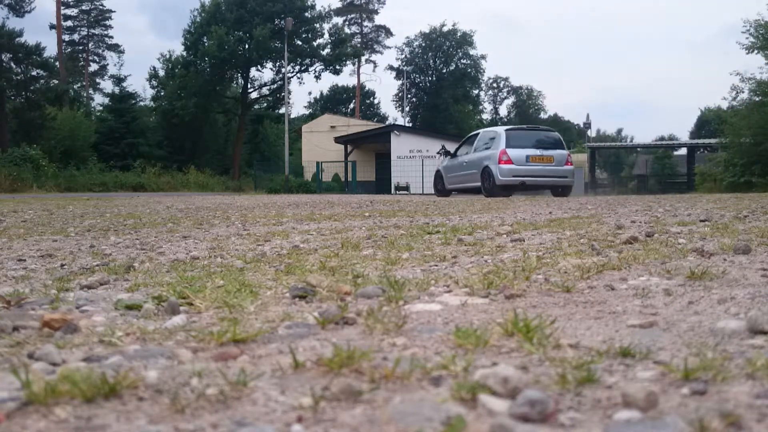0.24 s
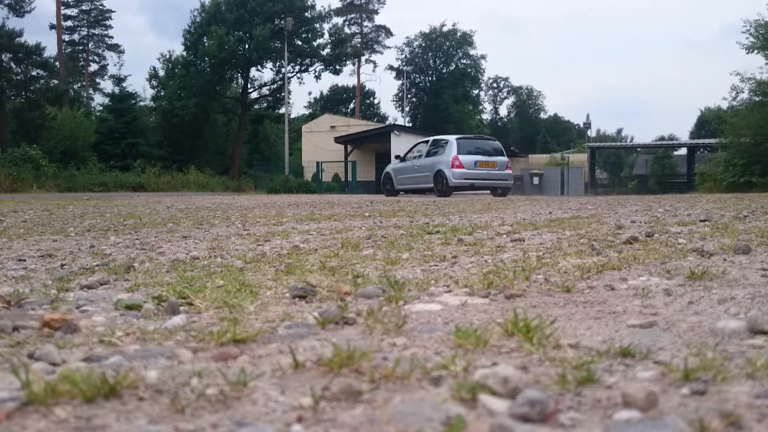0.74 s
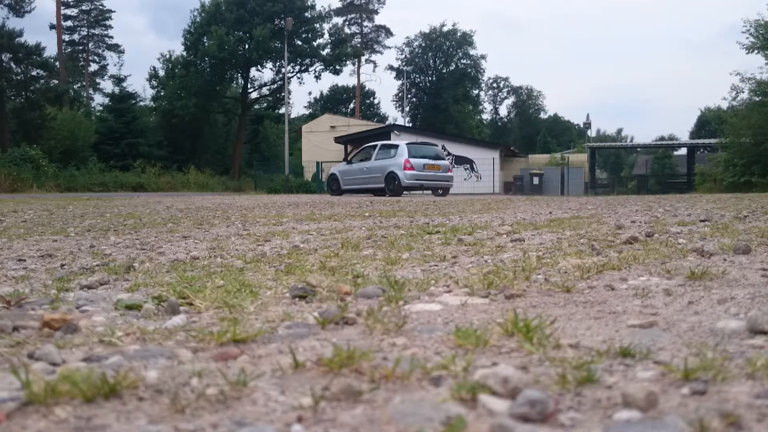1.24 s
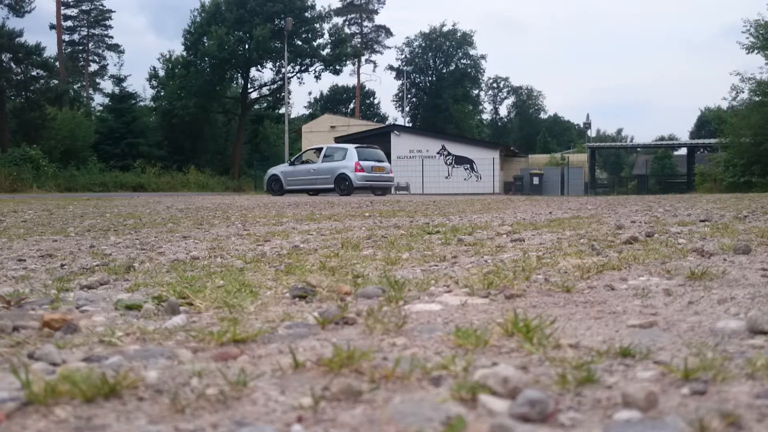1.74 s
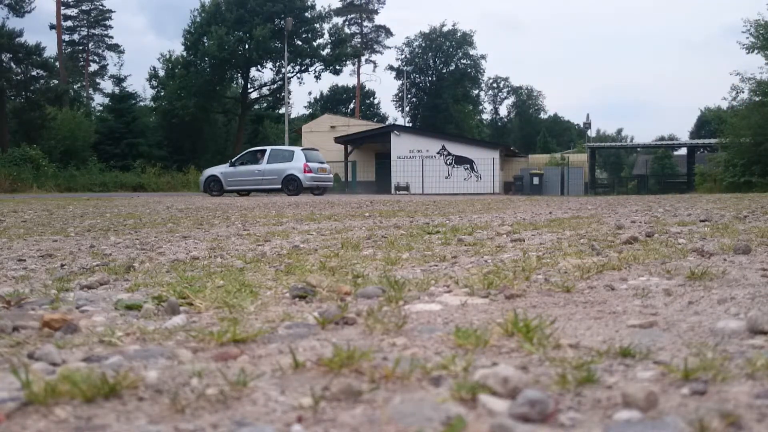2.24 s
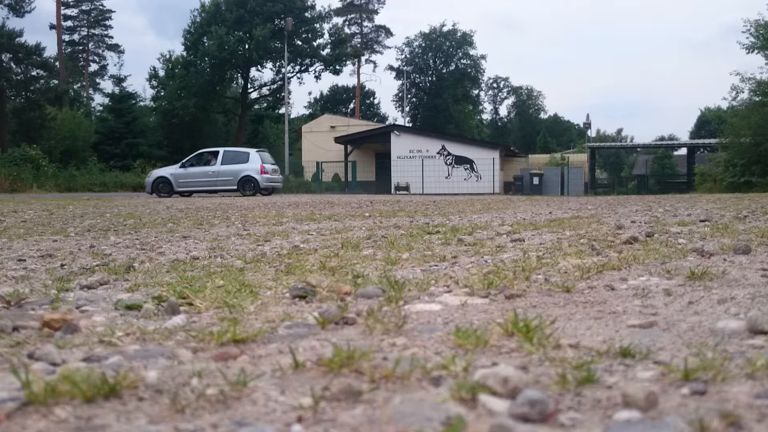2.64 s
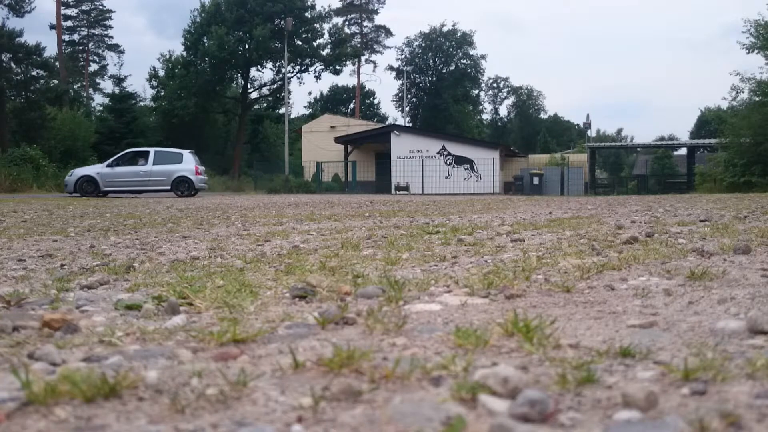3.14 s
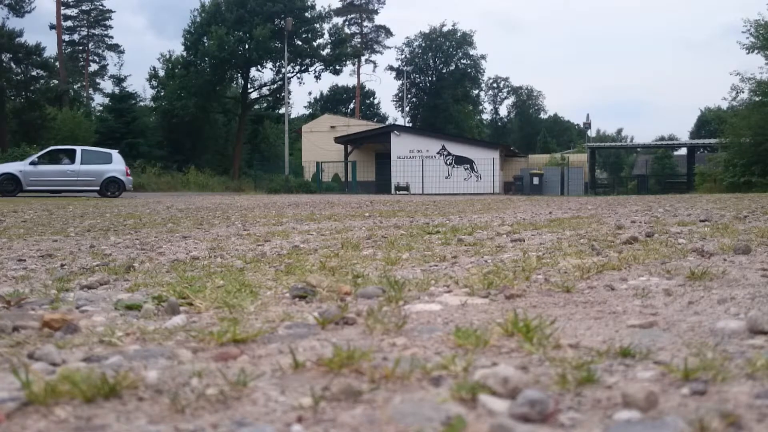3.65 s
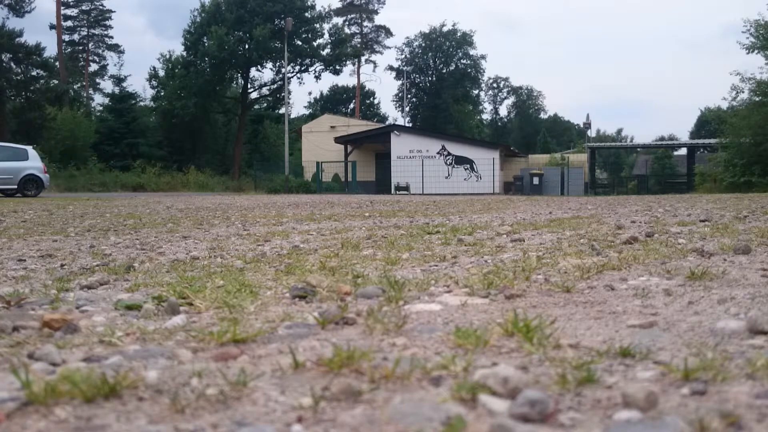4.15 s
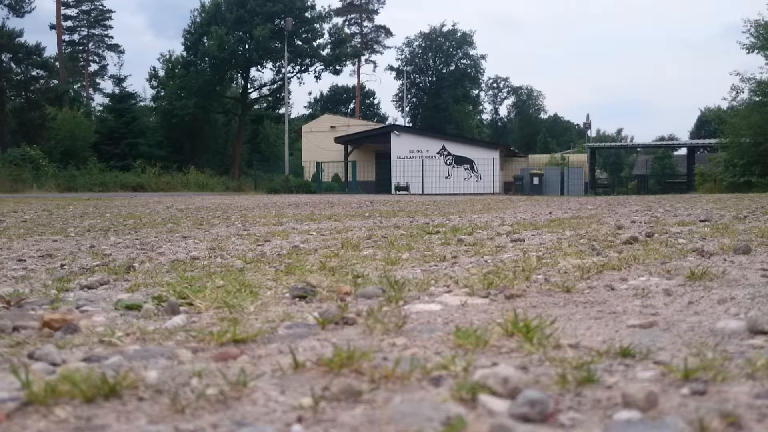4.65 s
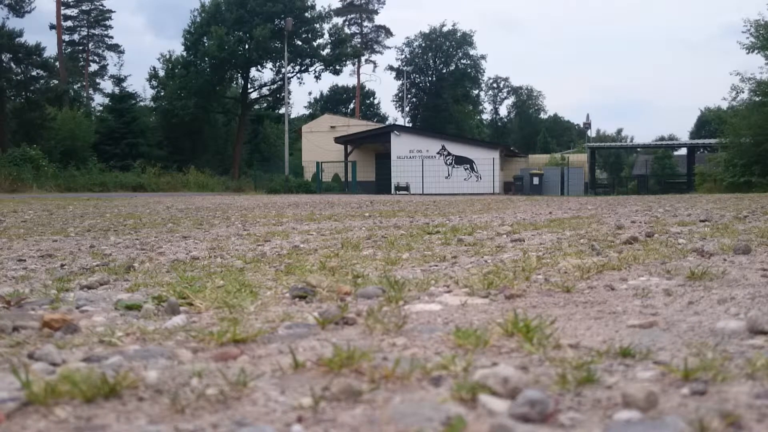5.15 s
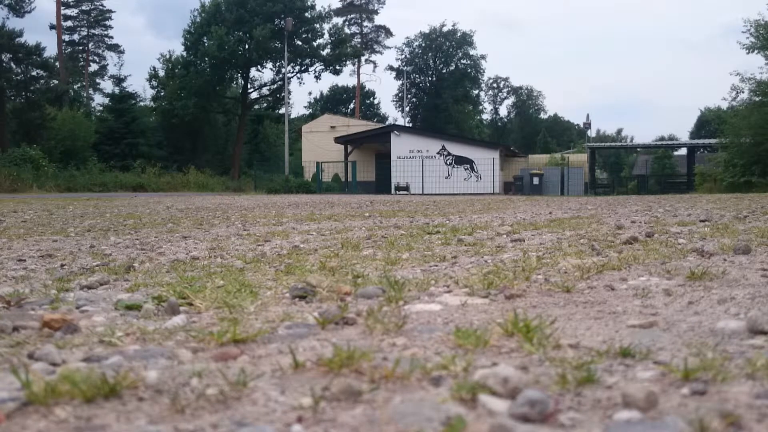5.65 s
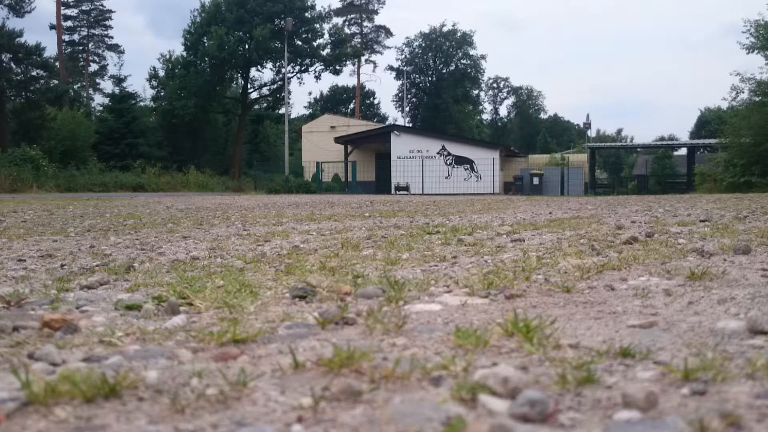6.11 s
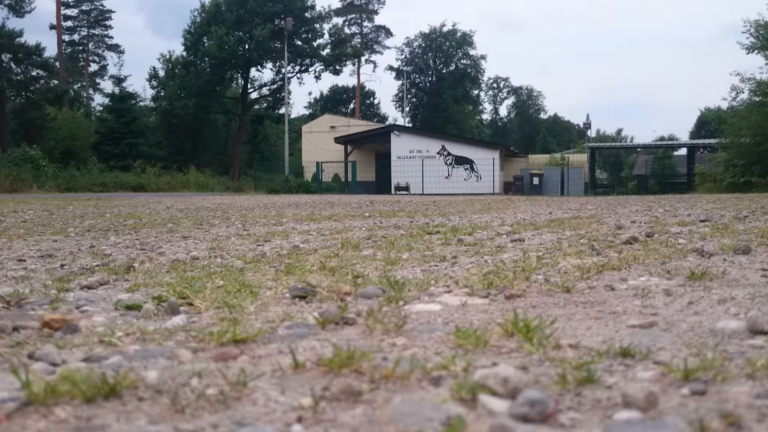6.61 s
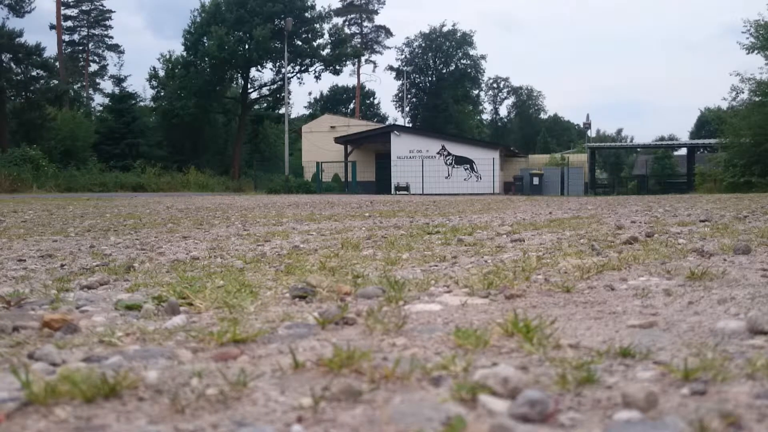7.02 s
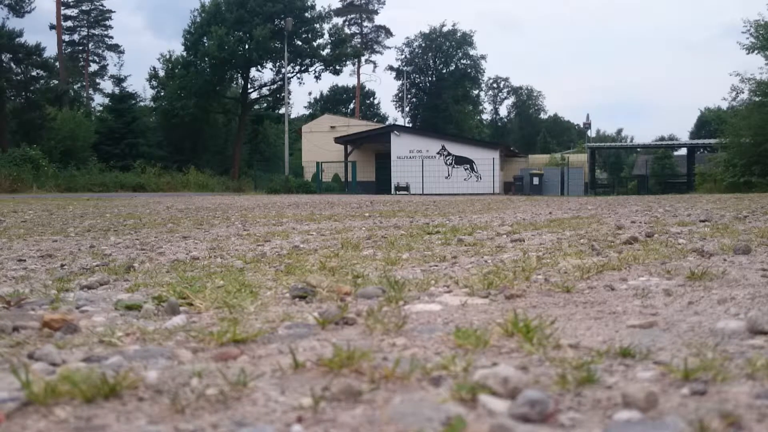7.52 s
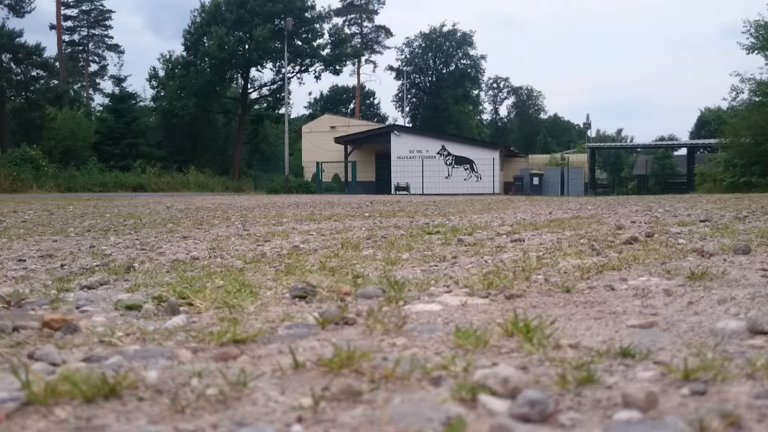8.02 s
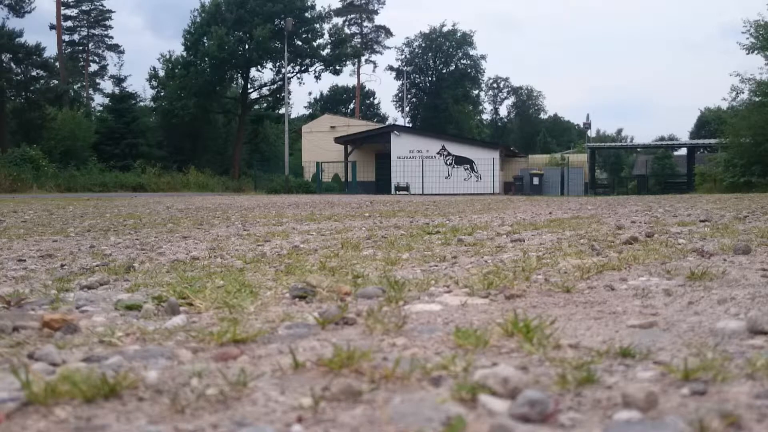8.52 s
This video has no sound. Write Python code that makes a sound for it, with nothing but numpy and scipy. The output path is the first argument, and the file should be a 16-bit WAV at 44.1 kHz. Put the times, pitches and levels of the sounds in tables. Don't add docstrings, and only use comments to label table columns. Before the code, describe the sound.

A small car with a loud, droning exhaust rolls away crunching gravel, then accelerates hard to a roar, shifts up with burbling pops and pulls again.

```python
import sys
import numpy as np
from scipy import signal
from scipy.fft import rfft, irfft, next_fast_len
from scipy.io import wavfile
from scipy.ndimage import map_coordinates

SR = 44100
rng = np.random.default_rng(int(sys.argv[2]) if len(sys.argv) > 2 else 0)


def materialize(psi):
    bounded = np.clip(np.atleast_2d(psi).T, -1, 1)
    quanta = np.round(bounded * 32767).astype(np.int16)
    wavfile.write(sys.argv[1], SR, quanta)


def rack_gain(trim_db):
    fader = np.asarray(trim_db, float)
    return 10 ** (fader / 20)


N = 386757
TIME = np.arange(N) / SR


def unit(x):
    return x / np.sqrt(np.mean(x ** 2) + 1e-20)


def along(points, hz):
    f, v = np.transpose(points)
    return np.interp(np.log(hz + 1), np.log(f + 1), v)


def curves(rows):
    s, *cols = np.transpose(rows)
    return [np.interp(TIME, s, c) for c in cols]


def chance(clock):
    return map_coordinates(rng.standard_normal(9000), [clock + 2])


def wobble(rate):
    coarse = np.arange(0, N + 32, 32)
    return np.interp(np.arange(N), coarse, chance(coarse * rate / SR))


def coloured(x, points):
    m = next_fast_len(N + 8192)
    hz = np.fft.rfftfreq(m, 1 / SR)
    inside = (hz > points[0][0] / 2) & (hz < points[-1][0] * 2)
    return irfft(rfft(x, m) * rack_gain(along(points, hz)) * inside, m)[..., :N]


def noise(points):
    return unit(coloured(rng.standard_normal(N), points))


# time in seconds, firing rate in Hz.
FIRST_GEAR = [(0, 60.35), (.75, 63.78), (1.05, 60.53), (1.4, 60.43), (2.4, 55.04), (2.86, 55.13),
              (3.3, 60.3), (3.95, 64.68), (4.54, 74.2), (5.3, 93.02), (5.7, 110.6), (6.4, 157.7),
              (6.8, 184.5), (7, 195.5), (7.2, 207.7), (7.4, 216.6), (7.53, 222)]
# time in seconds, firing rate in Hz.
GEAR_CHANGE = [(7.6, 222), (7.66, 217.5), (7.72, 209.5), (7.78, 200.6), (7.9, 189), (8.08, 169),
               (8.14, 159), (8.21, 143.5), (8.26, 141.5), (8.37, 136.8), (8.44, 140.3), (8.77, 147)]


def speed():
    rows = [(s, np.log(hz)) for s, hz in list(FIRST_GEAR) + list(GEAR_CHANGE)]
    return np.exp(curves(rows)[0])


# time in seconds, throttle from 0 to 1, pressure left in the pipe from 0 to 1.
THROTTLE = [
    (7.56, 1, 1),
    (7.63, 0, .6),
    (7.95, 0, 0),
    (8.21, 0, 0),
    (8.235, 1, 1),
]
SECOND_GEAR_S, OPEN_AGAIN_S = THROTTLE[-2][0], THROTTLE[-1][0]


def throttle():
    opening, pressure = curves(THROTTLE)
    return 1 - opening, 1 - pressure


# time in seconds, firing tone in dB, fullness of the pulse in dB,
# third order in dB, edge of the pulse in dB.
EFFORT = [(0, -22.5, 0.5, 3, 2), (.56, -21, -2.5, -2.5, -1.5), (.8, -24.5, -11, -2.5, -16),
          (1.7, -27, 0, -2, -11), (2.2, -31.5, -0.5, 2, -8), (2.7, -29, 1, 2, -15),
          (2.95, -27.5, 7.5, 2.5, -6.5), (3.93, -22.5, -0.5, -1.5, -2), (4.04, -17.5, -4.5, -4, 0),
          (4.5, -14.5, -7.5, -13.5, -7), (5, -16.5, -3.5, -3.5, -5), (5.3, -14.5, -6, -1, -6.5),
          (5.7, -16.5, -7.5, -8, -7), (6.15, -18.5, -7.5, -0.5, -8.5), (6.36, -17, 1, -13.5, -3),
          (6.6, -17.5, 3.5, 0, 0.5), (6.85, -20, 4.5, 5, 4), (7.4, -20, 3.5, 6, 7.5)]
SECOND_EFFORT = [(8.24, -14.5, -0.5, 0, -1), (8.4, -15, -3.5, -5, -1.5), (8.58, -11, -11.5, -6.5, -16),
                 (8.68, -12.5, -6.5, -7.5, -15), (8.77, -16, -13, -6.5, -13.5)]
# time in seconds, level in dB.
SHIFT = [(7.56, 0), (7.617, -12), (7.66, 0), (8.02, 0), (8.06, -5), (8.14, -2), (8.195, -15), (8.232, 1),
         (8.247, 6), (8.262, 3), (8.6, 0)]


def effort():
    tone_db, full_db, third_db, edge_db = curves(list(EFFORT) + list(SECOND_EFFORT))
    shift_db, = curves(SHIFT)
    return tone_db + shift_db, full_db, third_db, edge_db, shift_db


# centre in seconds, length in seconds, order, change in dB.
FLARES = [(.4, 0.12, 4, 6.5), (1.35, .12, 2, -5), (1.85, 0.066, 2, -12), (2.1, 0.17, 2, 7.5),
          (2.37, 0.073, 2, -9), (2.55, 0.071, 2, -1), (2.75, 0.041, 2, -1), (1.3, .3, 3, 2.5),
          (1.85, .06, 3, -4), (2.098, 0.17, 3, 1), (2.8, 0.11, 3, -4.5), (3.224, .08, 3, 6.5),
          (3.422, .08, 3, -7), (3.694, .12, 3, 3.5), (3.987, 0.038, 3, 7.5), (3.25, .07, 4, 4),
          (4.05, 0.051, 2, -11), (5.852, 0.13, 2, 5.5), (7.502, 0.084, 2, 0), (8.55, 0.098, 2, -1.5),
          (4.9, 0.3, 5, 2), (5.7, 0.22, 5, 2), (5.1, 0.12, 3, 3), (7.8, 0.054, 2, 7), (5.1, .2, 6, -2),
          (5.25, 0.13, 7, 3.5), (5.6, 0.27, 8, -3), (5.6, .3, 9, -9), (6.05, 0.21, 7, -10), (6.1, .1, 6, 2),
          (6.1, 0.086, 2, -2.5), (6.25, .12, 4, 8), (6.36, 0.072, 7, 7.5), (6.4, 0.066, 3, 4),
          (6.7, .12, 6, -4.5), (6.8, 0.033, 2, 4), (6.8, 0.053, 1, -1.5), (6.98, .08, 1, 4),
          (7.02, 0.11, 2, -3.5), (7.2, 0.22, 5, 4), (7.2, .1, 4, 3.5), (7.35, .12, 6, 8),
          (7.5, 0.054, 5, -4.5), (7.78, 0.055, 4, 15), (8.33, 0.12, 6, 2.5), (8.58, 0.089, 1, -7)]


def flare(order, rows=FLARES):
    t = np.arange(0, N / SR + .01, .005)
    db = 0 * t
    for s, length, k, peak_db in rows:
        if round(k) == order:
            db = db + peak_db * np.exp(-((t - s) / length) ** 2)
    return np.interp(TIME, t, db)


# time in seconds, uneven firing from 0 to 1, random rumble in dB under the tone.
UNEVEN = [(0, .12, -17), (2.5, .15, -12), (4, .12, -21), (5.2, .08, -23), (6.2, .07, -20), (7.5, .05, -20),
          (7.65, .1, -15), (8.05, .15, -11), (8.17, .24, -8), (8.25, .07, -22), (8.77, .07, -23)]


def order(cycles, k, lag):
    jitter = (.05 + .5 * curves(UNEVEN)[0]) * k ** .6 * wobble(14)
    return np.cos(2 * np.pi * k * cycles - lag + jitter)


# time in seconds, lag between orders in radians.
LEAN = [(0, 0), (1.2, .4), (2.2, .9), (2.8, 1.2), (3.1, -.1), (4, -.1), (6.5, 1), (7.5, .8), (8.24, .65)]
# frequency in Hz, level in dB.
LOW_PIPE = [(100, 1), (140, -4.5), (190, 1), (225, 2.5), (270, -4), (350, -5), (450, -0.5), (650, -17)]
# frequency in Hz, level in dB.
PIPE = [(230, 8.5), (300, -5.5), (570, 1.5), (720, -1), (900, 6), (1060, 11), (1200, -1), (2000, 9.5)]
# frequency in Hz, level in dB.
SECOND_PIPE = [(500, -1), (700, 1), (850, 5), (1000, 3), (1300, 0)]
# firing rate in Hz, level of the upper orders in dB.
UPPER_BY_RATE = [(60, -0.7), (75, 2), (120, -3.5), (150, 3.5), (220, -3.5)]
# firing rate in Hz, extra fall from order to order at a crawl in dB.
CRAWL_FALL = [(64, 8), (80, 0)]
KICK = 0.21


def firing_orders(cycles, hz):
    _, full_db, hard_db, edge_db, shift_db = effort()
    lean, = curves(LEAN)
    _, empty = throttle()
    uneven = curves(UNEVEN)[0]
    second = round(SECOND_GEAR_S * SR)

    octave_db = -4.5 + full_db + along(LOW_PIPE, 2 * hz) - 20 * empty + wobble(5)
    third_db = -11 + 1.53 * hard_db + along(LOW_PIPE, 3 * hz) - 30.5 * empty + 2 * wobble(8.2)
    upper_db = -25.5 + 0.82 * edge_db - 19 * empty + along(UPPER_BY_RATE, hz)
    upper_db += KICK * np.maximum(shift_db, 0)

    note = rack_gain(flare(1)) * order(cycles, 1, 0)
    note += rack_gain(octave_db + flare(2)) * order(cycles, 2, lean)
    note += rack_gain(third_db + flare(3)) * order(cycles, 3, 2 * lean)
    for k in range(4, 10):
        pipe_db = np.r_[along(PIPE, k * hz[:second]), along(SECOND_PIPE, k * hz[second:])]
        fall_db = 3.5 * (k - 5) + along(CRAWL_FALL, hz) * max(k - 5, 0)
        flutter_db = (.5 + 12 * uneven) * wobble(9)
        level_db = upper_db + flare(k) + pipe_db - fall_db + flutter_db
        note += rack_gain(level_db) * order(cycles, k, lean * (k - 1))
    return note


# firing rate in Hz, level of the half order in dB.
HALF_BY_RATE = [(60, -13), (75, -13), (140, -14), (170, -4), (200, 3), (220, 1)]
# firing rate in Hz, level of the higher half orders in dB.
HALVES_BY_RATE = [(55, -5), (63, 1), (68, -1), (75, -9), (110, -17), (150, -6), (200, -3), (222, 2)]
# firing rate in Hz, level in dB under the tone.
QUARTER_BY_RATE = [(55, -13), (62, -19), (72, -25), (95, -33), (125, -31), (150, -24), (220, -26)]
# time in seconds, level in dB.
BURBLE_SWELL = [(7.98, 0), (8.02, -4), (8.08, 5), (8.15, 8), (8.2, -2)]
# centre in seconds, length in seconds, order, change in dB.
HALF_FLARES = [(.5, .12, 1, 5), (4.15, .15, 1, 4), (6.03, .09, 4, 13), (6.08, .1, 6, 22), (7.73, .06, 2, 8),
               (7.1, .2, 1, 3)]
BURBLE_FOLLOWS = .3


def half_orders(cycles, hz):
    tone_db, _, _, _, shift_db = effort()
    shut, empty = throttle()
    swell_db, = curves(BURBLE_SWELL)
    second = round(SECOND_GEAR_S * SR)

    burble_db = 12.5 + swell_db + 4 * wobble(22) - (1 - BURBLE_FOLLOWS) * shift_db
    half_db = tone_db - 24 + (1 - shut) * along(HALF_BY_RATE, hz) + shut * burble_db
    halves_db = tone_db - 17.5 + along(HALVES_BY_RATE, hz) + (swell_db - 4.5) * shut
    halves_db += KICK * np.maximum(shift_db, 0)
    halves_db[second:] -= 6
    shut_quarter_db = -11 - 12.5 * (1 - empty)
    quarter_db = tone_db + (1 - shut) * along(QUARTER_BY_RATE, hz) + shut * shut_quarter_db
    quarter_db[second:] -= 7

    note = rack_gain(half_db + 0.85 * wobble(29)) * order(cycles, .5, 0)
    for k in (.75, 1.25):
        note += rack_gain(quarter_db - 5 * (k < 1) + 3 * wobble(9)) * order(cycles, k, k)
    for k in np.arange(1.5, 7):
        level_db = halves_db + flare(int(k), HALF_FLARES) + 8 - 4.5 * k + 2.5 * wobble(6)
        note += rack_gain(level_db) * order(cycles, k, 1.4 * k)
    return note


# frequency in Hz, density in dB per Hz.
RUMBLE = [(40, -33.5), (70, -7), (100, -4), (200, -4.5), (280, -9), (350, -8.5), (500, -15.5), (800, -40)]


def exhaust(cycles):
    hz = speed()
    tone_db = effort()[0]
    uneven, rumble_db = curves(UNEVEN)
    note = rack_gain(tone_db) * firing_orders(cycles, hz) + half_orders(cycles, hz)
    note *= -np.sqrt(2) * (1 + uneven * chance(cycles / 2))
    return note + rack_gain(tone_db + rumble_db + 1.2 * wobble(12)) * noise(RUMBLE)


# time in seconds, peak in dB, frequency in Hz.
POPS = [
    (7.645, -25, 80),
    (7.8445, -8, 280),
    (8.022, -19, 260),
    (8.131, -16, 220),
    (8.155, -24, 110),
    (8.2305, -16, 300),
    (8.2305, -21, 750),
    (8.2455, -16, 300),
    (8.2525, -17, 300),
]


def pops(note):
    for s, db, hz in POPS:
        t = TIME - s
        swallowed = .85 * (s < 8.2) * np.exp(-((t - .007) / .007) ** 2)
        swing = np.sin(2 * np.pi * hz * t) * np.exp(-(t * hz / .55) ** 2)
        note = note * (1 - swallowed) + 1.3 * rack_gain(db) * swing
    return note


# time in seconds, level in dB.
ROAR = [(4.2, -83), (5.3, -58.5), (5.9, -53.5), (6.2, -43.5), (6.36, -41), (6.7, -41), (6.9, -36.5),
        (7.45, -36), (7.61, -40.5), (7.7, -36), (7.95, -38.5), (8.08, -43.5), (8.16, -41), (8.25, -45),
        (8.5, -52.5), (8.77, -50)]
# time in seconds, share of gas roar against gravel from 0 to 1.
LOAD = [(0, 0), (4.2, .1), (5.6, .9), (8.77, 1)]
# time in seconds, level in dB over the roar.
BRIGHT = [(7.2, -17.5), (7.45, -13), (7.7, -9.5), (8.2, -9), (8.45, -4.5), (8.77, -5.5)]
# frequency in Hz, density in dB per Hz.
GAS_HIGH = [(1100, -11), (1500, 3), (2000, -1), (2550, -6.5), (3100, -10.5), (3800, -13), (4600, -37.5)]
# frequency in Hz, density in dB per Hz.
GAS_TOP = [(2000, -20.5), (2700, -0.5), (3700, -3), (4300, -20)]
# frequency in Hz, density in dB per Hz.
GAS_LOW = [(300, 4.5), (500, 8.5), (800, 5.5), (1050, 9), (1400, 1.5), (1900, -59)]
# frequency in Hz, density in dB per Hz.
GAS_SHUT = [(300, 9.5), (500, -0.5), (800, 2.5), (1050, 1), (1400, 0.5), (1900, -59)]


def gas_jet(cycles):
    (roar_db,), (load,), (bright_db,), (shift_db,) = curves(ROAR), curves(LOAD), curves(BRIGHT), curves(SHIFT)
    shut, _ = throttle()
    throb = unit(1 + 0.041 * np.cos(2 * np.pi * cycles) + 0.16 * wobble(30))
    low_db = 9 - 2 * shut + 0.43 * np.maximum(shift_db, 0) + 3 * (TIME > OPEN_AGAIN_S)
    low = np.sqrt(1 - shut) * noise(GAS_LOW) + np.sqrt(shut) * noise(GAS_SHUT)
    jet = noise(GAS_HIGH) + rack_gain(bright_db) * noise(GAS_TOP) + rack_gain(low_db) * low
    return rack_gain(roar_db) * np.sqrt(load) * throb * jet


# frequency in Hz, density in dB per Hz.
FIZZ = [(3400, -30), (4200, 0.5), (5200, -3.5), (6500, -6.5), (8000, -11.5), (9500, -19.5), (11000, -22.5),
        (15000, -25.5)]
JET_OPENS_S, JET_RISE_S, JET_RISE_DB = 5.94, 0.38, 16


def fizz():
    roar_db, = curves(ROAR)
    closed = np.clip((JET_OPENS_S + JET_RISE_S - TIME) / JET_RISE_S, 0, 1)
    level_db = -57 + 0.39 * (roar_db + 39) - JET_RISE_DB * closed
    flutter = rack_gain(.5 * wobble(6) + 1.4 * wobble(14))
    ports = np.array([noise(FIZZ), noise(FIZZ)])
    return rack_gain(level_db) * flutter * (ports + 0.4 * noise(FIZZ))


def grit(points, clumps):
    size_db = 3.5 * np.minimum(rng.exponential(size=N), 3.5)
    hits = (rng.random(N) < 1500 / SR) * rack_gain(size_db) * rng.standard_normal(N)
    return unit(clumps * (.7 * unit(coloured(hits, points)) + noise(points)))


# time in seconds, gravel level in dB.
CRUNCH = [(0, -47), (.3, -50), (.58, -49), (.68, -49.5), (1.1, -48), (1.5, -47), (1.85, -48.5),
          (2.2, -48.5), (2.7, -52), (3.145, -56), (3.165, -48), (3.5, -49.5), (3.62, -55), (3.95, -56.5),
          (4.05, -50.5), (4.15, -59.5), (4.4, -55.5), (5.5, -58)]
# frequency in Hz, density in dB per Hz.
GRIT_LOW = [(300, -8.5), (450, -11), (630, -6), (760, -4.5), (1000, -5.5), (1400, -11), (1900, -54)]
# frequency in Hz, density in dB per Hz.
GRIT_HIGH = [(1100, -30), (1500, 0), (2000, -5), (3000, -16), (3800, -25), (4800, -40)]
# frequency in Hz, density in dB per Hz.
BOOM = [(190, -30), (235, -3), (270, 0), (300, -8), (360, -30)]


def gravel():
    (crunch_db,), (load,) = curves(CRUNCH), curves(LOAD)
    clumps = rack_gain(.3 * wobble(12) + wobble(40) + 2 * wobble(110))
    crunch = grit(GRIT_HIGH, clumps) + rack_gain(10) * grit(GRIT_LOW, clumps)
    boom = rack_gain(7 + 2 * wobble(6)) * noise(BOOM)
    return rack_gain(crunch_db) * np.sqrt(1 - load) * (crunch + boom)


# time in seconds, peak in dB, ring frequency in Hz.
STONES = [(0.0974, -16, 960), (0.114, -22.5, 990), (0.317, -11.5, 1380), (0.321, -19, 726),
          (0.386, -17.5, 990), (0.433, -15.5, 1290), (0.455, -16, 925), (0.536, -21.5, 1000),
          (0.786, -41, 828), (0.833, -17.5, 750), (0.959, -19.5, 1200), (1.16, -15.5, 760),
          (1.176, -15, 1340), (1.31, -32, 770), (1.356, -19.5, 830), (3.304, -25, 1200),
          (1.674, -27.5, 1190), (1.699, -15.5, 790), (1.897, -19.5, 935), (2.094, -19, 990),
          (3.494, -33, 1377), (3.245, -32, 810), (1.434, -15.5, 965), (3.1635, -29, 1040),
          (3.179, -23, 1276), (3.393, -22, 910), (3.976, -25.5, 780), (4.021, -36, 1050),
          (4.029, -32.5, 1700), (4.045, -27.5, 1075), (4.056, -21, 1210), (4.4448, -28, 1310),
          (0.002, -21.5, 1470), (0.034, -22.5, 2230), (0.05, -22, 1100), (0.162, -34, 1870),
          (0.1914, -22.5, 950), (0.334, -25.5, 1900), (0.376, -17, 1700), (0.414, -23.5, 1010),
          (0.495, -30.5, 2620), (0.5647, -21, 1300), (0.586, -25, 2020), (1.141, -22, 930),
          (1.512, -17, 1250), (2.3095, -23.5, 1320), (2.604, -26.5, 1320), (2.636, -31.5, 985),
          (2.759, -28, 800), (3.183, -20.5, 1320), (3.172, -24, 1100), (3.312, -24.5, 1150),
          (3.401, -24, 1010), (3.217, -32.5, 1500), (3.235, -37.5, 1900), (3.42, -30.5, 1240),
          (3.448, -36, 1110), (3.74, -31, 1400), (3.885, -34.5, 1220), (5.877, -24, 878)]
# frequency in Hz, density in dB per Hz.
CRACK = [(500, -20), (900, 0), (1800, -3), (3000, -17), (4500, -40)]
# frequency in Hz, gain in dB.
BITE = [(300, -6), (600, 0), (3400, 0), (4500, -16), (6000, -40)]


def stones():
    out, t = np.zeros(N + SR), np.arange(900) / SR
    crack = noise(CRACK)
    for s, db, hz in STONES:
        at = round(s * SR)
        ring = np.sin(2 * np.pi * hz * t) * rack_gain(-60 * t * hz / 15)
        split = crack[at:][:len(t)] * rack_gain(-60 * t / .007)
        onset = 1 - np.exp(-t / 0.0005)
        out[at:][:len(t)] += rack_gain(db + 1) * onset * (.7 * ring + .6 * split)
    return coloured(out[:N], BITE)


# time in seconds, gear whine in dB.
WHINE = [(4.25, -88), (4.42, -71), (4.58, -72), (4.7, -79), (4.82, -73), (4.95, -77), (5.1, -70),
         (5.22, -80), (5.45, -72), (5.6, -82), (6, -92)]


def whine(cycles):
    db, = curves(WHINE)
    return rack_gain(db + 2 * wobble(12)) * np.sin(2 * np.pi * 43 * cycles + .4 * wobble(25))


# time in seconds, frequency in Hz, level in dB.
CHIRPS = [
    (1.26, 4000, -62),
    (1.3, 4500, -63),
    (1.33, 4000, -64),
    (3.0, 4200, -70),
    (4.27, 2220, -62),
]


def birds():
    out = np.zeros(N)
    for s, hz, db in CHIRPS:
        swell = np.exp(-((TIME - s) / .045) ** 2)
        out += rack_gain(db) * swell * wobble(.13 * hz - 100) * np.sin(2 * np.pi * hz * TIME)
    return out


# frequency in Hz, density in dB per Hz.
BREEZE = [(8, 10.5), (40, 4.5), (90, -47)]


def breeze():
    return rack_gain(-48.5) * noise(BREEZE)


# frequency in Hz, level in dB.
SCATTER = [(100, -36), (250, -24), (500, -16), (1000, -14), (2000, -11), (4000, -3.5), (8000, -11)]


def scattered(x):
    t, hop = np.arange(SR // 5) / SR, round(.25 * SR)
    fade_in = np.minimum(np.arange(N) / len(t) * 10, 1)
    x = np.pad(x * fade_in, (hop, 2 * hop))
    wet = np.zeros((2, N + 2 * SR))
    window = np.sin(np.pi * np.arange(2 * hop) / (2 * hop))
    for at in range(0, N + hop, hop):
        tail = rng.standard_normal((2, len(t))) * rack_gain(-60 * t / 0.5)
        tail /= np.linalg.norm(tail[0])
        piece = x[at:at + 2 * hop] * window
        wet[:, at:at + 2 * hop + len(t) - 1] += signal.fftconvolve(piece[None], tail, axes=1)
    return coloured(wet[:, hop:hop + N], SCATTER)


# frequency in Hz, density in dB per Hz.
HISS = [(500, -20), (2500, 6.5), (4300, -3), (6500, -3.5), (8200, -4.5), (9500, -10.5), (11000, -15.5),
        (15000, -20)]


def hiss():
    faded = np.clip((TIME - 4.55) / .9, 0, 1)
    bed = rack_gain(-65.5) * np.array([noise(HISS), noise(HISS)])
    top = coloured(bed, [(7500, -40), (9500, 0), (16000, 0)])
    top_db = 2.5 - 14.5 * faded
    return bed + (rack_gain(top_db) - 1) * top


# time in seconds, delay of the right port in ms.
BEARING = [(0, -0.08), (1.5, -0.006), (2.75, 0.1), (3.3, 0.13), (4.6, 0.2), (5.25, 0.26), (6, 0.39),
           (6.85, 0.42), (7.45, 0.37), (7.75, 0.27), (8.25, 0.26), (8.77, 0.19)]
# frequency in Hz, gain of the right port in dB.
PORT = [(8, 2.1), (300, 2), (800, 1.4), (2000, .3), (4800, -4.5), (6000, 1.5), (10000, 0)]
BITE_S = 8.243


def scene():
    cycles = np.cumsum(speed()) / SR
    cycles += -cycles[round(BITE_S * SR)] % 1
    car = pops(exhaust(cycles)) + gas_jet(cycles) + gravel() + stones() + whine(cycles)
    near = car + birds() + breeze()
    late_ms, = curves(BEARING)
    later = map_coordinates(near, [np.arange(N) - late_ms * SR / 1000], mode="nearest")
    left, right = np.array([near, later]) + scattered(near) + fizz()
    right = -coloured(np.pad(right, (0, SR // 20), mode="reflect"), PORT)
    return np.array([left, right]) + hiss()


def top_cut(x):
    return signal.sosfilt(signal.butter(12, 15760, fs=SR, output="sos"), x)


def record(dry):
    return top_cut(dry)


dry = scene()
out = record(dry)
materialize(out)
```